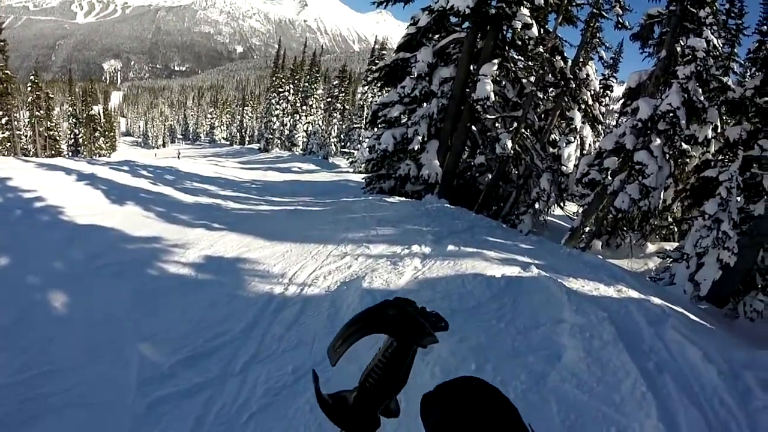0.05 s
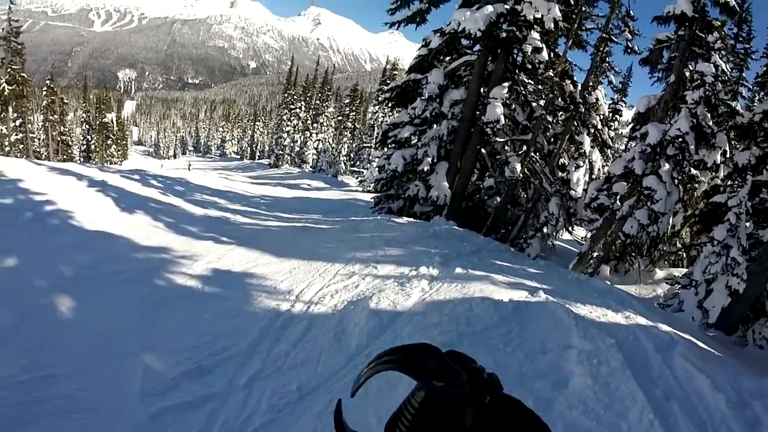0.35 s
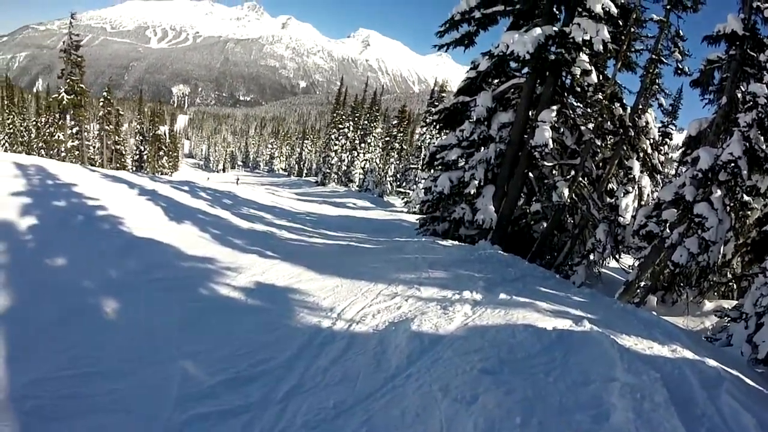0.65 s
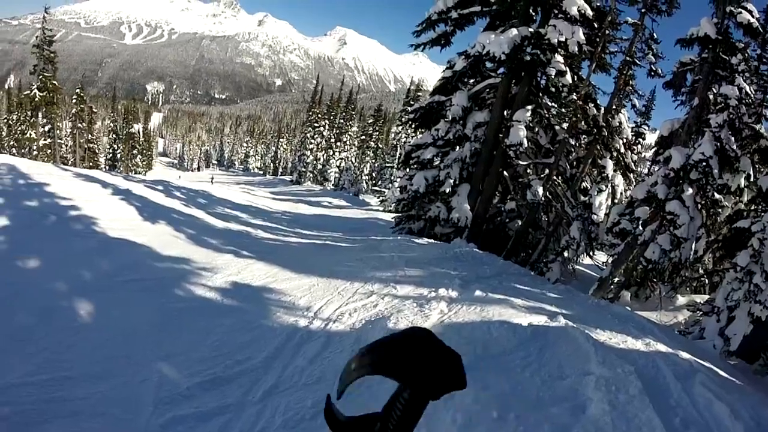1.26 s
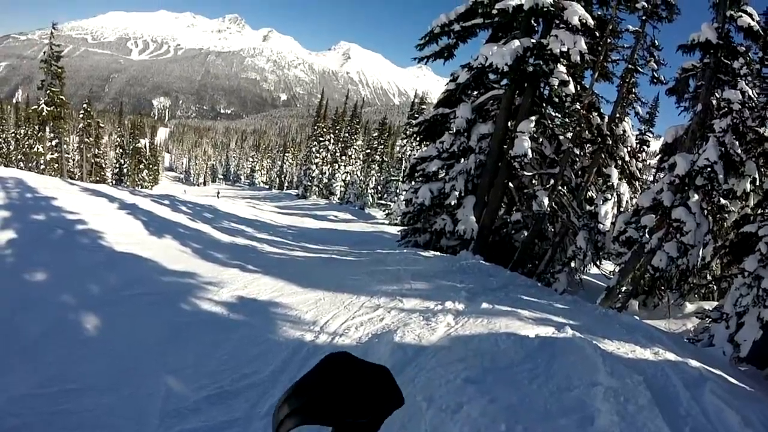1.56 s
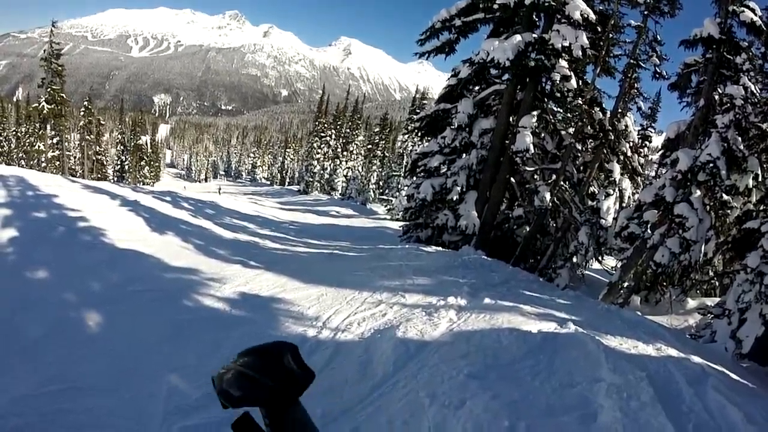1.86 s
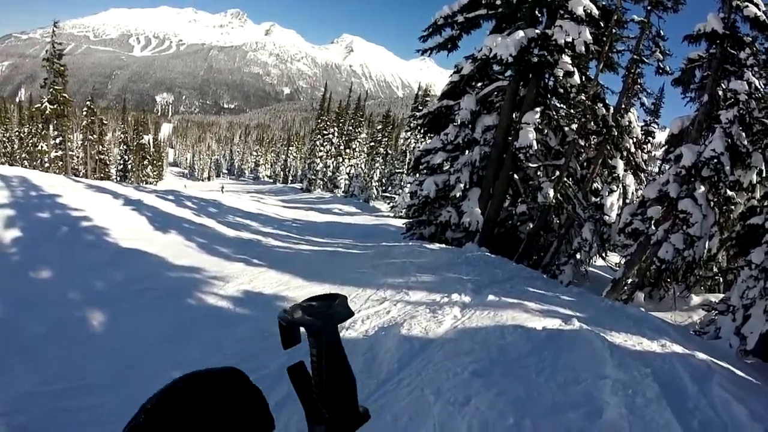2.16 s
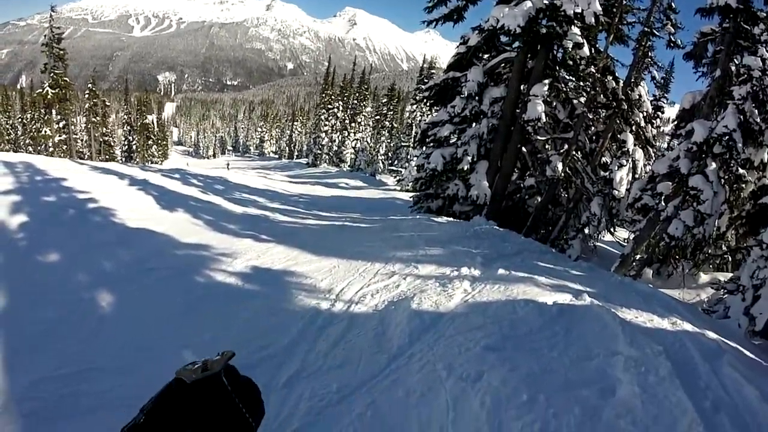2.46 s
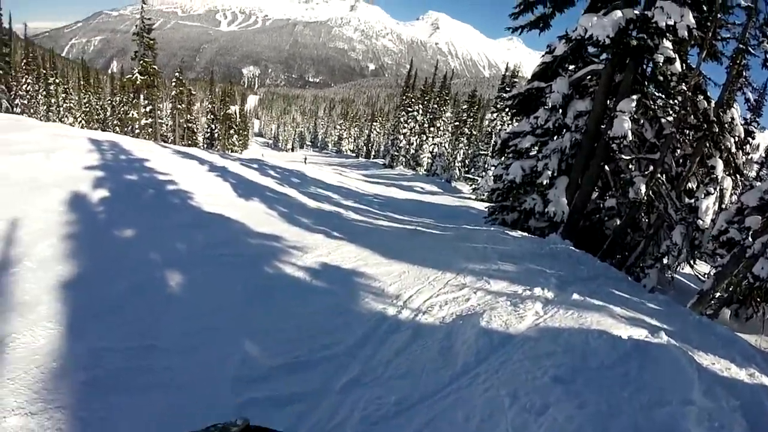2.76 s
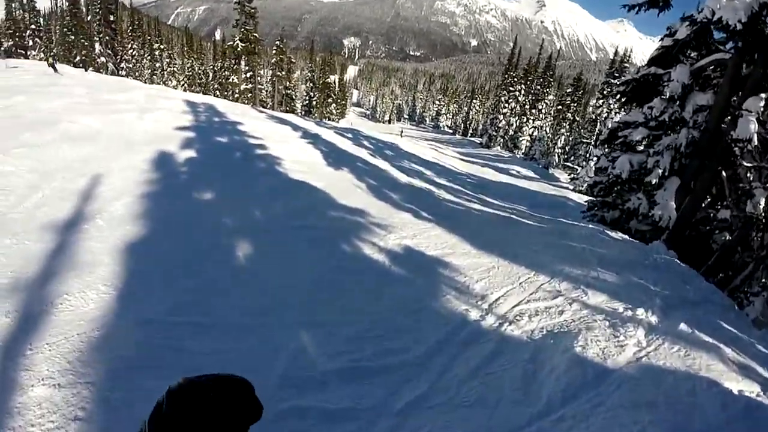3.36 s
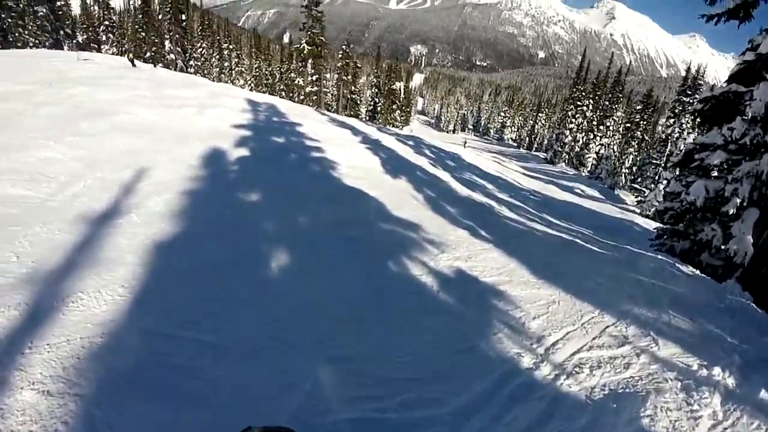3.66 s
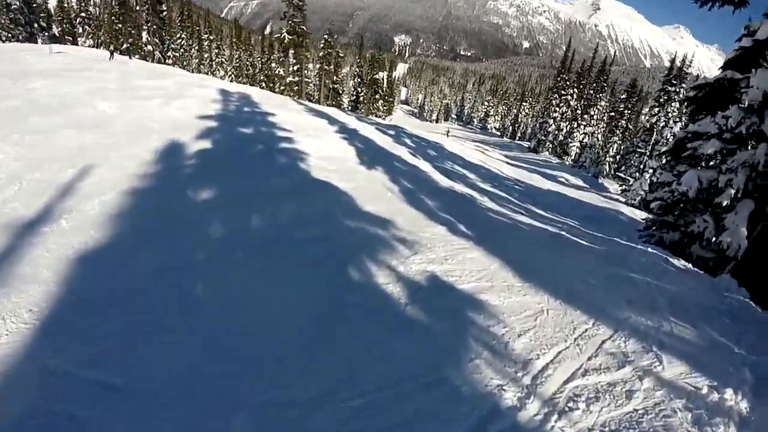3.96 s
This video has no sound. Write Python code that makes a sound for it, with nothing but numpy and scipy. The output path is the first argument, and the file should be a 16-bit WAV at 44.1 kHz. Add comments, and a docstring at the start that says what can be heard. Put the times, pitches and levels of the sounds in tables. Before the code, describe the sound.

Sharp plastic clicks of ski pole straps, then skis hissing on snow with wind rumble.

```python
"""Faint air hisses over a quiet slope. A skier fits the pole straps: gloves bump the body, plastic
grips and buckles click close by, and at 1.1 s a buckle's metal rings thinly.
From about 2 s the skis glide: snow hiss grows and moving air rumbles on the microphone.
Around 3 s the poles scuff the snow among the last clicks; hiss and rumble run on to the end."""
import sys
import numpy as np
from scipy.fft import rfft, irfft, next_fast_len
from scipy.io import wavfile
from scipy.ndimage import uniform_filter1d, map_coordinates

SR = 44100
rng = np.random.default_rng(int(sys.argv[2]) if len(sys.argv) > 2 else 0)


def wav_out(sig):
    """Save sig, one row per channel (or a flat mono array), as 16-bit PCM at SR to the path in sys.argv[1]."""
    wavfile.write(sys.argv[1], SR, np.round(np.clip(np.atleast_2d(sig).T, -1, 1) * 32767).astype(np.int16))


N = 176400  # 4 s

# Still air over the slope: freq_hz, relative_db
AIR_SPECTRUM = [(53, -40), (90, -3.5), (190, -5), (300, -7), (510, -10), (733, -12.5), (1840, -17),
                (3350, -20), (15000, -38.5)]
# Air on the microphone: time_s, rumble_db, flutter_db (both before trim)
WIND_LEVELS = [(0.0, -63, -82), (0.3, -64, -79), (1.83, -60, -73), (1.92, -51, -57), (2.0, -47, -66),
               (2.06, -64, -64), (2.135, -63, -72), (2.16, -47, -58), (2.23, -36, -65), (2.3, -41, -54),
               (2.41, -35, -51), (2.57, -33, -47), (2.615, -48, -56), (2.65, -38.5, -40.5),
               (2.78, -33.5, -38.5), (2.885, -40.5, -45), (2.93, -34, -58), (3.0, -38.5, -46),
               (3.05, -31.5, -47.5), (3.12, -33.5, -48.5), (3.16, -42.5, -53), (3.201, -37, -54),
               (3.26, -43.5, -60), (3.34, -49, -57), (3.41, -41, -54), (3.47, -46.5, -57),
               (3.56, -47.5, -55), (3.61, -36.5, -59), (3.66, -46, -55), (3.73, -42.5, -50.5),
               (3.8, -54, -58), (3.88, -40, -37), (3.93, -48, -50), (4.0, -55, -62)]
# Deep wind rumble: freq_hz, relative_db
RUMBLE_SPECTRUM = [(10, -16), (22, -8.5), (32, -1.5), (42, -1), (52, -3.5), (62, -17.5), (80, -34),
                   (170, -60), (700, -120)]
# Wind flutter above the rumble: freq_hz, relative_db
FLUTTER_SPECTRUM = [(20, -53), (45, -13), (58, -1), (74, 1), (86, -12), (108, -29.5), (170, -48),
                    (1500, -120)]
# Gloves against the body: start_s, level_db, pitch_hz
GLOVE_BUMPS = [(0.029, -47.5, 35.7), (.578, -52, 45), (1.03, -43, 36.7), (1.465, -49, 34),
               (1.584, -48.5, 34), (1.959, -39, 34)]
# Skis on snow: time_s, level_db
GLIDE_LEVELS = [(0, -79), (1.8, -72), (2.25, -68.5), (2.55, -65.5), (2.85, -63.5), (3.05, -64.5),
                (3.25, -63.5), (3.55, -65), (3.75, -63), (4, -64.5)]
# Snow hiss: freq_hz, relative_db
SNOW_SPECTRUM = [(150, 1), (500, 0.5), (1000, -2.5), (2200, -9), (4200, -10), (7500, -12), (10000, -16.5),
                 (12500, -25), (15000, -46)]
# Resonances in the hiss: centre_hz, width_hz, lift_db
SNOW_RESONANCES = [(1560, 710, 10.5), (3440, 900, 13.5), (5270, 1000, 7.5), (6750, 440, 3.5),
                   (8400, 1100, 5.5)]
# Poles rubbing snow: start_s, length_s, level_db, centre_hz, width_hz
POLE_SCUFFS = [(2.795, 0.028, -66.5, 8700, 450), (2.803, 0.038, -61, 3300, 700),
               (2.848, 0.079, -68, 5580, 520), (2.872, .028, -63.5, 3450, 600),
               (3.086, 0.08, -63.5, 3200, 500), (3.083, 0.1, -62, 1490, 700)]
# Metallic ring of a buckle: start_s, level_db, pitch_hz, t60_s
BUCKLE_PINGS = [(1.0645, -63, 8650, .04), (1.096, -57, 9020, .03), (1.101, -67, 8550, .13)]
# Plastic grip modes: pitch_hz, relative_db, t60_ratio (to the click's t60_s)
GRIP_MODES = [(1276, -19.5, 1.9), (1580, -16, 1.3), (1890, -18.5, 1.5), (2530, -12, 1.34), (2950, -6, 1.25),
              (3304, 0, 0.96), (3530, -7, 1.2), (3750, -12, 1.1), (4050, -10.5, 1.2), (4730, -17, 1),
              (5370, -10, 1.2), (6190, -20, 0.97), (6600, -21, 1.2), (9250, -29, 0.58)]
# Contact noise: freq_hz, relative_db
CRACK_SPECTRUM = [(200, -14), (800, -13), (1300, -6.5), (2100, -8), (3300, 6.5), (4500, -6), (6200, -10),
                  (7500, -17.5), (11500, -22.5), (15000, -49)]
# Grip and buckle contacts: start_s, level_db, knock_db, ring_db, edge_db, t60_s, note_hz, note_db
GRIP_CLICKS = [(0.179, -59, 14, 8, 0, 0.012, 3570, 3), (.7627, -63, 12, 3, 3, 0.013, 1550, 6),
               (1.0622, -47, 5, -1.5, 11, 0.017, 3070, 1), (1.0866, -50, 8, -2, -1, 0.015, 3400, 2),
               (1.0932, -43.7, 3.5, -6, 8, 0.011, 3150, -1), (1.0986, -47, 2, -8, 9, 0.0096, 2570, -1.5),
               (1.2871, -33.5, -5.5, 3, -5, 0.0165, 3440, -6), (1.4273, -43, 6.5, 2, 2, 0.0066, 3490, 5),
               (1.4450, -51, -11, 6, 6, 0.01, 3390, 6.5), (1.7746, -53.7, 12, 0, 8, 0.011, 3120, -5),
               (1.8806, -69, 6, 0, 6, 0.015, 2380, 12.5), (1.9084, -54.7, 19, -2, 7, 0.013, 1620, 4.5),
               (2.6122, -63, 24, -2, 0, 0.02, 1180, 14.5), (2.8255, -60, -2, -5, -5, .007, 3450, 5),
               (2.8398, -54, -9, 7.5, 15, 0.02, 3600, -2), (2.8585, -64, 0, 5, 22, .01, 8100, -1),
               (3.048, -60, 6, -3, 2, .01, 3900, 3), (3.075, -56, 22.5, -7, -3, 0.0089, 2870, 6),
               (3.216, -60, -6, 8, 3, 0.009, 4200, 0), (3.2286, -59, 0, 7, 8, .012, 3570, -2),
               (3.2849, -56.5, 0, 2, 11, 0.0097, 3600, 1)]


def amp(db):
    """dB to gain."""
    return 10 ** (np.asarray(db) / 20)


def unit(x):
    """x at rms 1."""
    return x / np.sqrt(np.mean(x ** 2) + 1e-20)


def along(points, hz):
    """(freq_hz, value) points read on a log axis."""
    freqs_hz, values = np.transpose(points)
    return np.interp(np.log(hz + 1), np.log(freqs_hz + 1), values)


def curve(rows):
    """(time_s, value) points, one value per sample."""
    return np.interp(np.arange(N) / SR, *np.transpose(rows))


def wobble(rate_hz):
    """Smooth random curve, rate_hz knots a second."""
    knots = rng.standard_normal(int(N * rate_hz / SR) + 4)
    return map_coordinates(knots, [np.arange(N) * rate_hz / SR])


def filtered(x, response):
    """x through the gain response(hz)."""
    size = next_fast_len(2 * len(x))
    return irfft(rfft(x, size) * response(np.fft.rfftfreq(size, 1 / SR)), size)[:len(x)]


def noise(spectrum_db, size=N):
    """Noise of rms 1, shaped by spectrum_db(hz)."""
    return unit(filtered(rng.standard_normal(size), lambda hz: amp(spectrum_db(hz))))


def add(track, start_s, sound):
    """Mix sound into track at start_s."""
    part = track[round(start_s * SR):][:len(sound)]
    part += sound[:len(part)]


def still_air(level_db=-61):
    """Faint, even hiss of the open slope."""
    return amp(level_db) * noise(lambda hz: along(AIR_SPECTRUM, hz))


def eddies(spectrum, steadiness=0.63, window_s=0.071):
    """Turbulent noise of rms 1, its swells and lulls partly evened out."""
    turbulence = noise(lambda hz: along(spectrum, hz))
    power = np.abs(uniform_filter1d(turbulence ** 2, int(window_s * SR))) + 1e-6
    return unit(turbulence / power ** (steadiness / 2))


def wind(rumble_trim_db=0.5, flutter_trim_db=-0.15):
    """Air buffets the microphone: deep rumble, quicker flutter in the stronger puffs."""
    levels = np.array(WIND_LEVELS)
    rumble = amp(curve(levels[:, [0, 1]]) + rumble_trim_db) * eddies(RUMBLE_SPECTRUM)
    flutter = amp(curve(levels[:, [0, 2]]) + flutter_trim_db) * eddies(FLUTTER_SPECTRUM)
    return rumble + flutter


def glove_bumps(rise_s=0.0097):
    """A glove meets the body: a dull swing of two or three cycles."""
    out, t = np.zeros(N), np.arange(SR // 4) / SR
    for start_s, level_db, pitch_hz in GLOVE_BUMPS:
        envelope = t / rise_s * np.exp(1 - t / rise_s)
        add(out, start_s, amp(level_db) * envelope * np.sin(2 * np.pi * pitch_hz * t))
    return out


def ski_glide(swell_db=0.55, grain_db=1):
    """Skis slide on snow: grainy hiss with broad resonances, growing as they get moving."""
    def resonances_db(hz):
        return sum(lift_db / (1 + (2 * (hz - centre_hz) / width_hz) ** 2)
                   for centre_hz, width_hz, lift_db in SNOW_RESONANCES)

    hiss = noise(lambda hz: along(SNOW_SPECTRUM, hz) + resonances_db(hz))
    envelope = amp(curve(GLIDE_LEVELS) + swell_db * wobble(rate_hz=9.2))
    grain = amp(grain_db * wobble(rate_hz=700))
    return envelope * unit(hiss * grain)


def pole_scuffs(rise_s=0.0054, grain_db=2):
    """Poles rub packed snow: short grainy strokes, each around one pitch."""
    out = np.zeros(N)
    for start_s, length_s, level_db, centre_hz, width_hz in POLE_SCUFFS:
        rub = noise(lambda hz: -20 * np.log10(1 + 2 * ((hz - centre_hz) / width_hz) ** 2))
        stroke = curve([(start_s, 0), (start_s + rise_s, 1),
                        (start_s + length_s / 2, 1), (start_s + length_s, 0)])
        grain = amp(grain_db * wobble(rate_hz=300))
        out += amp(level_db) * stroke * unit(rub * grain)
    return out


def buckle_pings(rise_s=0.001):
    """A small metal part rings on after the first rattle."""
    out, t = np.zeros(N), np.arange(SR // 5) / SR
    for start_s, level_db, pitch_hz, t60_s in BUCKLE_PINGS:
        envelope = amp(level_db - 60 * t / t60_s) * (1 - np.exp(-t / rise_s))
        add(out, start_s, envelope * np.sin(2 * np.pi * pitch_hz * t))
    return out


def choked_decay(t, t60_s, attack_s=0.00048, hold_s=0.0012, bend=1.504):
    """Click envelope: the hand damps the ring ever faster."""
    decay_db = -60 * (np.maximum(t - hold_s, 0) / t60_s) ** bend
    return amp(decay_db) * (1 - np.exp(-t / attack_s))


def grip_ring(t, t60_s, colour, detune_ratio=0.0093):
    """The plastic grip's modes ring briefly, slightly detuned at each contact."""
    ring = np.zeros(len(t))
    for mode_hz, mode_db, t60_ratio in GRIP_MODES:
        pitch_hz = mode_hz * (1 + detune_ratio * rng.normal())
        envelope = amp(mode_db + along(colour, mode_hz)) * choked_decay(t, t60_s * t60_ratio)
        ring += envelope * np.sin(2 * np.pi * pitch_hz * t)
    return ring


def grip_clicks(crack_db=-5.5, crack_t60_ratio=0.94):
    """Each contact cracks, sounds the struck part and rings the grip; where it lands sets the colour."""
    knock_hz, core_hz, ring_hz, edge_hz = 1550, 3050, 5700, 9700
    out, t = np.zeros(N), np.arange(SR // 16) / SR
    for start_s, level_db, knock_db, ring_db, edge_db, t60_s, note_hz, note_db in GRIP_CLICKS:
        colour = [(knock_hz, knock_db), (core_hz, 0), (ring_hz, ring_db), (edge_hz, edge_db)]
        ring = grip_ring(t, t60_s, colour)
        part_note = amp(note_db) * choked_decay(t, t60_s) * np.cos(2 * np.pi * note_hz * t)
        burst = noise(lambda hz: along(CRACK_SPECTRUM, hz), size=len(t))
        crack = filtered(burst, lambda hz: amp(along(colour, hz)))
        crack *= amp(crack_db) * choked_decay(t, t60_s * crack_t60_ratio)
        add(out, start_s, amp(level_db) * (ring + part_note + crack))
    return out


def scene():
    """Mono mix, close and dry: snow returns no echo."""
    mix = still_air() + wind() + ski_glide()
    mix = mix + grip_clicks() + buckle_pings() + glove_bumps() + pole_scuffs()
    return mix[None]


def record(dry):
    """Brick-wall low-pass."""
    cutoff_hz = 15200
    return np.array([filtered(channel, lambda hz: hz < cutoff_hz) for channel in dry])


dry = scene()
out = record(dry)
wav_out(out)
```